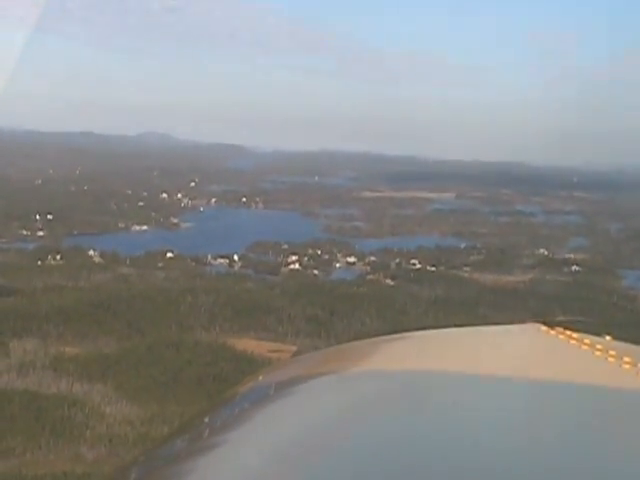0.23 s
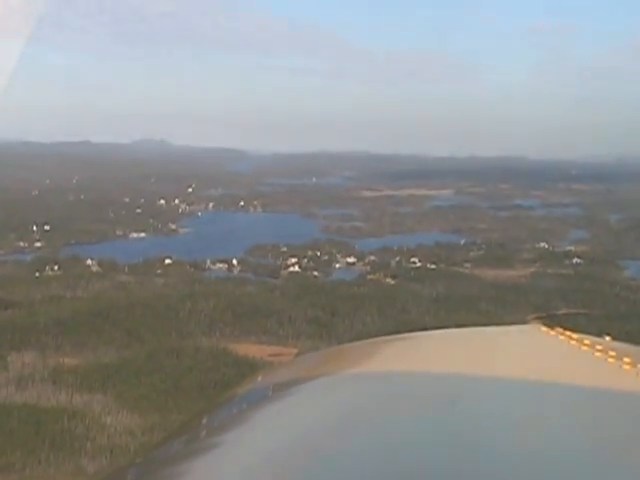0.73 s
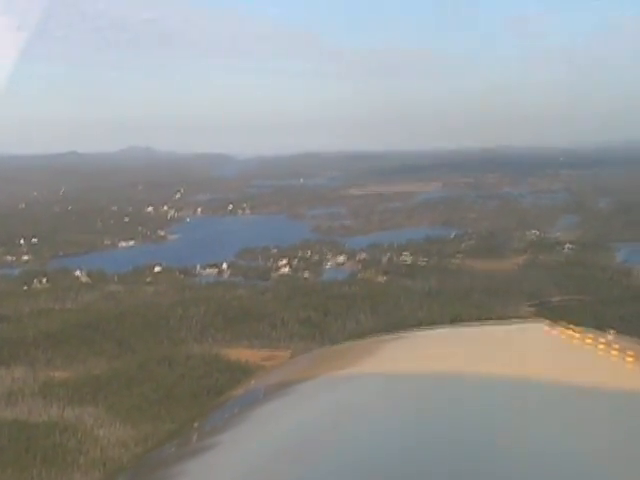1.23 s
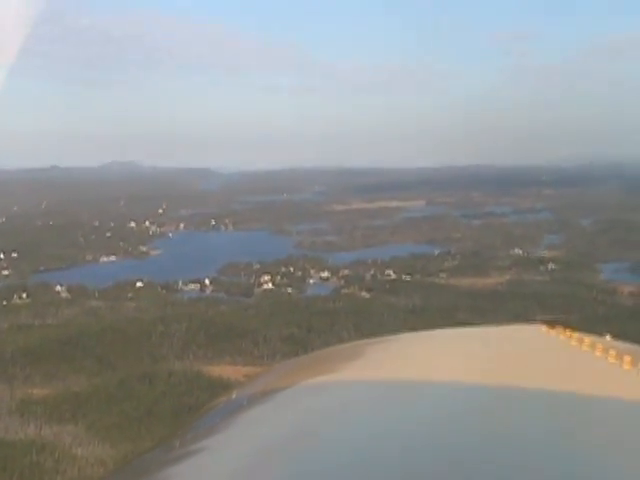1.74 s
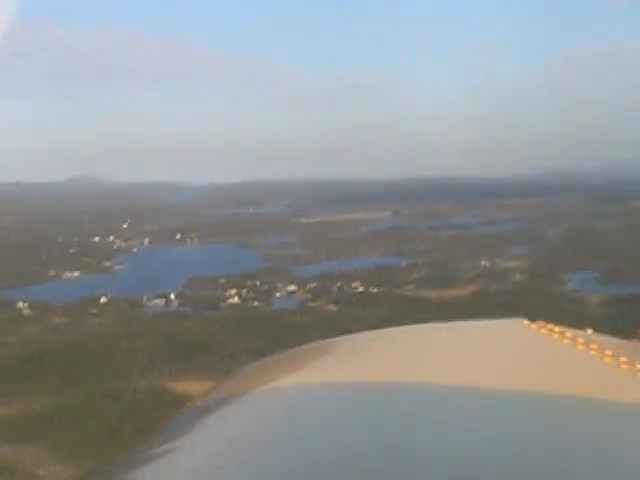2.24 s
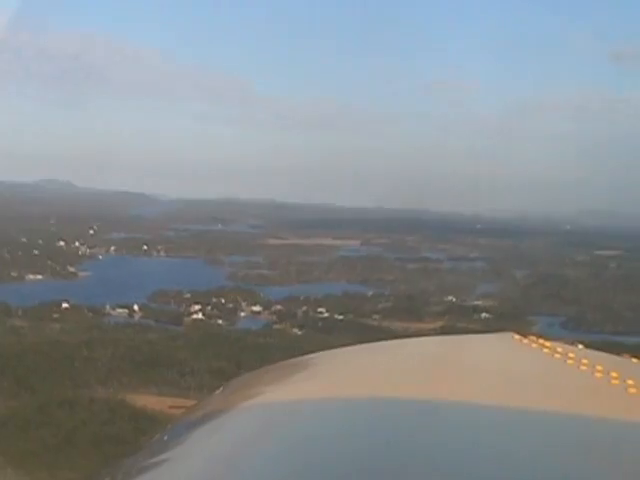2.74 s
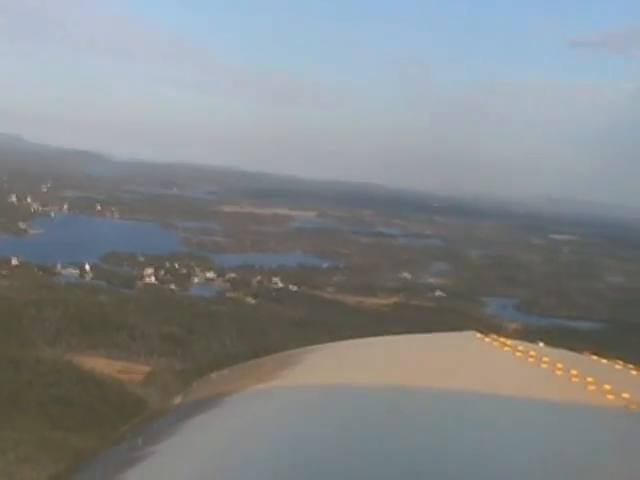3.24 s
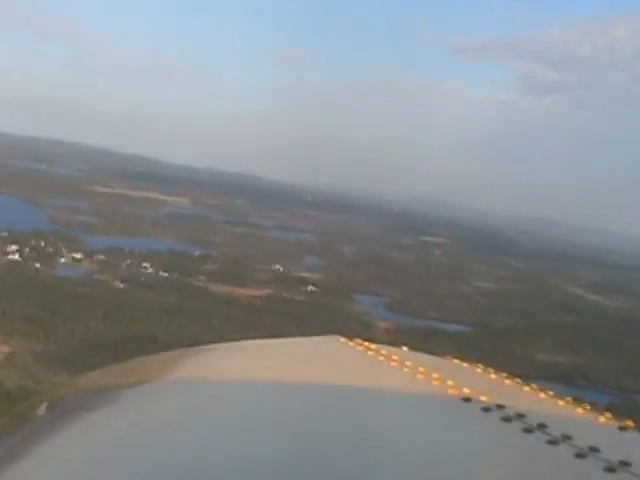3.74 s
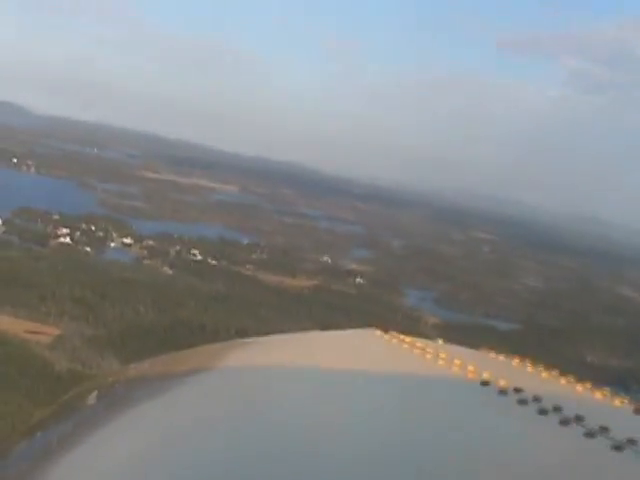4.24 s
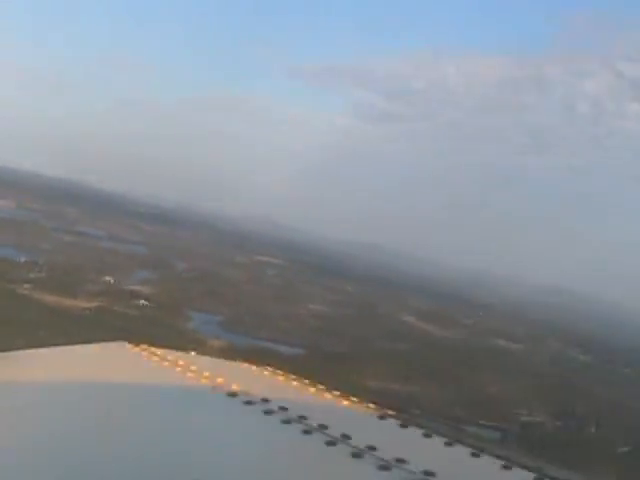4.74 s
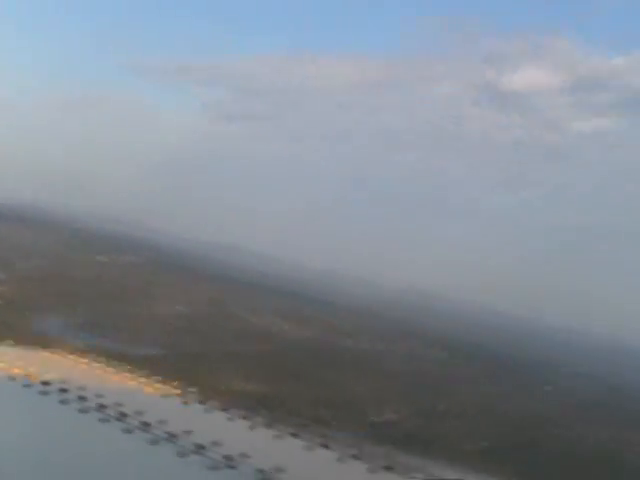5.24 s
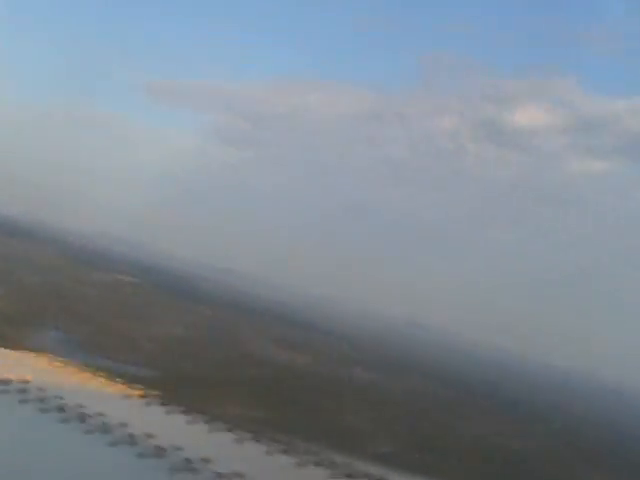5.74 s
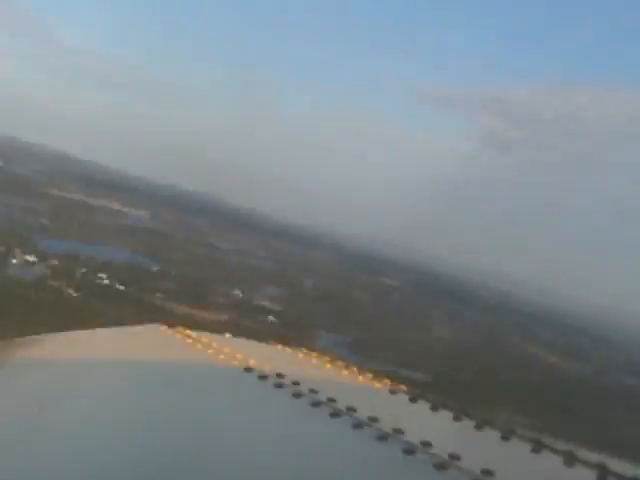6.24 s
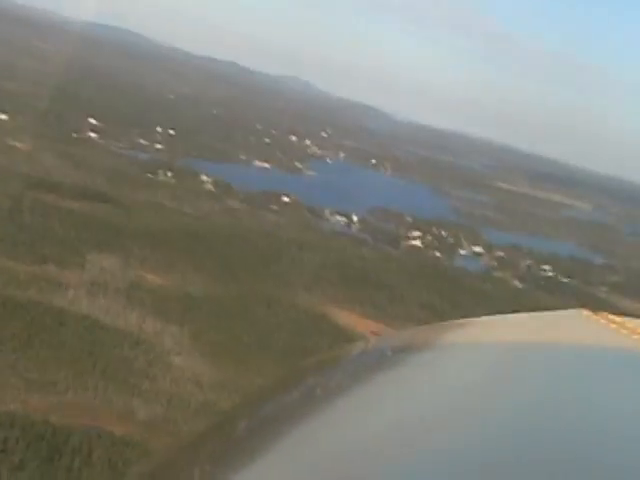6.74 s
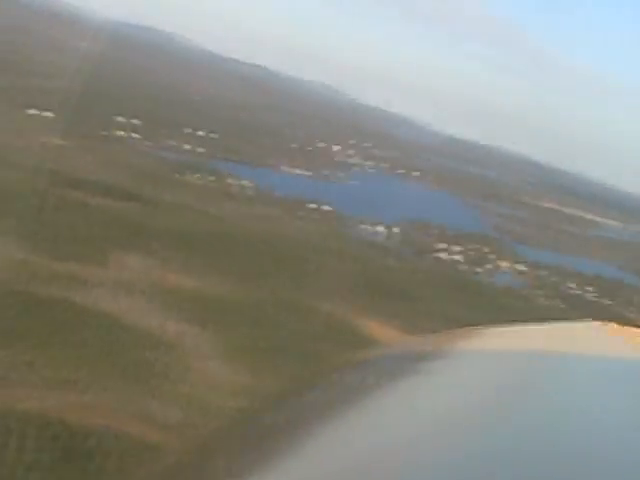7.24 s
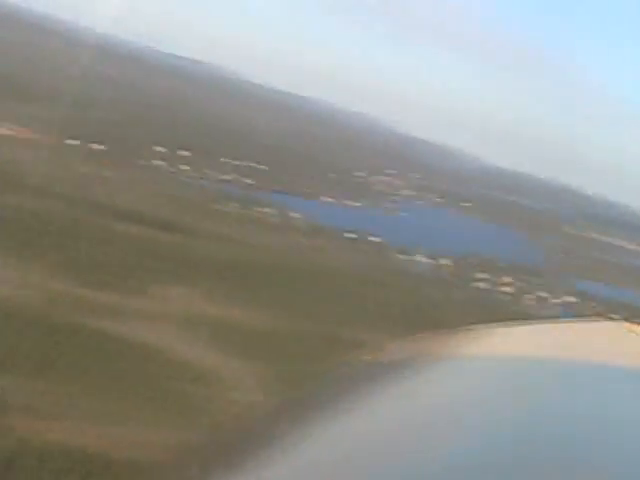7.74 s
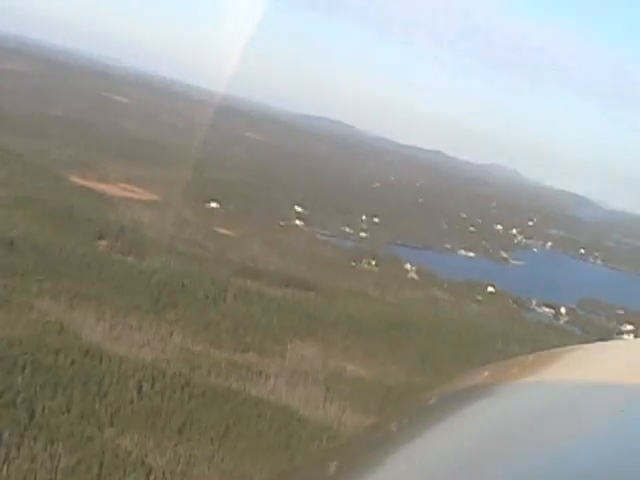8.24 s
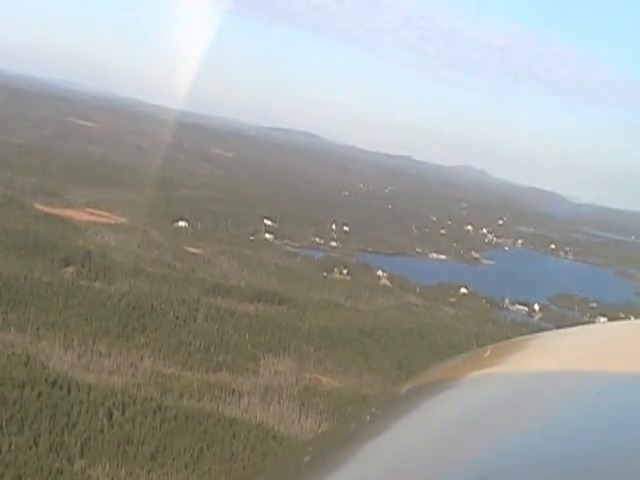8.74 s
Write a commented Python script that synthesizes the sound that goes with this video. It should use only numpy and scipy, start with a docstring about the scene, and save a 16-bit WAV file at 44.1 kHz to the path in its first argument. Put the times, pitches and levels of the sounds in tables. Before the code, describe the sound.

Steady throbbing drone of a small propeller plane heard from the cockpit, with airflow roar, a faint buzz and whine, one sharp knock and a softer one.

```python
"""The engine of a cruising light aircraft, heard close in the cockpit at a hand-held camera's two microphone ports.
The four-stroke is a sum of camshaft orders; a geared three-blade propeller adds blade passes, and a hum wavers.
Slipstream roar is shaped noise, lightly chopped by the turning engine.
The camera pans from the nose towards the wing, which changes the colour.
Two knocks on its body ring decaying modes, unequally at the ports."""
import sys
import numpy as np
from scipy import signal
from scipy.io import wavfile
from scipy.ndimage import uniform_filter1d

SR = 44100
rng = np.random.default_rng(int(sys.argv[2]) if len(sys.argv) > 2 else 0)


def waveform_to_disk(signal):
    """Save audio, clipped to [-1, 1], as 16-bit WAV at the path in sys.argv[1]."""
    frames = np.transpose(np.atleast_2d(signal))
    scaled = np.clip(frames, -1, 1) * 32767
    samples = np.round(scaled).astype(np.int16)
    wavfile.write(sys.argv[1], SR, samples)


N = 396018

# Camshaft speed in cruise: start_s, speed_rev_per_s
CAMSHAFT_SPEED = [(0, 35.234), (0.85, 35.236), (1.65, 35.31), (2.25, 35.32), (3.05, 35.24), (3.65, 35.32),
                  (4.75, 35.43), (5.3, 35.395), (5.6, 35.51), (6.15, 35.47), (7.0, 35.485), (7.8, 35.6),
                  (8.4, 35.6), (8.65, 35.52), (8.98, 35.518)]
# Engine orders in the cockpit, before they waver, level averaged over both ports:
# multiple of camshaft speed, forward_level_db (rms), wing_level_db (rms), left_minus_right_db
ENGINE_ORDERS = [(1, -47, -47, 0), (2, -30, -29, -1), (3, -40, -37, 1), (4, -23, -22, 1), (5, -36, -35, 1),
                 (6, -24, -26, 5), (7, -39, -36, 4), (8, -24, -22, 9), (9, -45, -49, 0), (10, -41, -37, 8),
                 (11, -34, -37, 7), (12, -44, -38, 11), (13, -39, -41, 4), (14, -46, -43, 2),
                 (15, -37, -42, 3), (16, -47, -39, 2), (17, -39, -35, 2), (18, -44, -47, 0),
                 (19, -49, -48, -1), (22, -53, -49, -5), (23, -45, -50, 6), (25, -44, -53, 6),
                 (26, -48, -47, -4), (27, -41, -48, 0), (28, -48, -49, 1), (29, -41, -43, 2),
                 (30, -50, -49, 0), (32, -38, -40, -1), (33, -48, -57, 3), (34, -40, -44, -2),
                 (35, -36, -41, -1), (36, -40, -46, 1), (37, -46, -51, -1), (38, -44, -47, -1),
                 (39, -43, -46, -2), (40, -42, -44, -3), (41, -47, -52, 1), (42, -44, -47, -1),
                 (43, -50, -52, -2), (44, -38, -33, -3), (45, -43, -45, 3), (46, -38, -45, 3),
                 (47, -54, -56, 3), (48, -39, -44, 2), (49, -45, -48, -2), (50, -46, -48, -1),
                 (51, -55, -57, 3), (52, -52, -46, 0), (53, -57, -56, -3), (54, -56, -59, -6),
                 (55, -68, -58, -2), (56, -58, -60, -2), (58, -57, -57, -3), (60, -52, -57, -1),
                 (64, -54, -56, -3), (67, -61, -58, -3), (68, -60, -58, -3), (70, -62, -58, -1),
                 (71, -64, -58, -1), (76, -68, -57, -4), (80, -53, -56, 0), (81, -58, -58, 0),
                 (82, -58, -51, -2), (83, -61, -54, -3), (84, -53, -55, -2), (86, -58, -47, -2),
                 (87, -60, -55, -2), (88, -52, -45, -3), (89, -57, -54, -2), (90, -48, -42, -4),
                 (91, -67, -58, -2), (92, -50, -51, 3), (94, -58, -57, -1), (96, -61, -54, -4),
                 (100, -66, -57, -4), (130, -62, -68, -1), (132, -61, -70, 0)]
# Buzz near 1.5 kHz, relative to its orders: start_s, level_db
BUZZ_LEVEL = [(0, -6), (0.7, -4), (0.9, 4), (1.8, 0), (2.05, -2), (2.35, -11), (2.7, -14), (3.3, 3),
              (4.2, 3.5), (5, 5.5), (6.1, 3), (6.25, -1.5), (7.1, -9.5), (7.8, -1.5), (8.5, -1.5),
              (8.98, -4.5)]
# Whine near 3.2 kHz, relative to its orders: start_s, lower_partial_db, whine_db, upper_partial_db
WHINE_LEVELS = [(0, -7, 3, 0), (1.2, -3, 1.5, 1), (2, -10, -2, 0), (4, -1, 0.5, 2), (5, -3, 2.5, -3),
                (5.6, 1, 1, -4), (6.3, -2, 3.5, -5), (6.6, 5, 0, -5), (7.3, 1.5, 4, 1), (7.55, -2, -2, 6),
                (8.1, -2, -1, 5), (8.5, 2, -5, 0), (8.98, 7, 2, -3)]
# Blade passes of the geared propeller, before they waver:
# multiple of propeller speed, level_db (rms), left_minus_right_db
BLADE_PASSES = [(1, -44, 0), (3, -24.5, 0), (6, -38, 4), (15, -47, 3)]
# Slipstream and engine roar, before it drifts: pitch_hz, forward_level_db (per Hz), wing_level_db (per Hz)
ROAR_SPECTRUM = [(22, -73, -70), (32, -55, -59), (50.3, -55, -49.5), (80, -54, -55), (117, -47, -51.5),
                 (156, -48.5, -49.5), (192, -49, -46.5), (225, -52.5, -51.5), (275, -50, -49.5),
                 (333, -55.5, -57), (400, -54.5, -54.5), (468, -55, -56), (760, -62, -63.5),
                 (1280, -61.5, -61), (1320, -66, -65.5), (1470, -67, -70), (1565, -65, -65.5),
                 (1940, -72.5, -75), (2680, -77.5, -75.5), (3140, -76, -73), (4110, -84, -84.5),
                 (4630, -83.5, -84.5), (5300, -90, -88), (9800, -91, -88), (11470, -94, -89.5),
                 (12500, -104, -102)]
# Roar near 1.4 kHz, relative; the engine orders there follow in part: start_s, level_db
MID_ROAR_LEVEL = [(0, 1.5), (5.6, 2), (6, -6), (6.4, -2), (7.1, -2), (7.3, -6), (8.65, -8), (8.85, 1),
                  (8.98, 7)]
# Treble hiss around 11 kHz, relative: start_s, level_db
TREBLE_LEVEL = [(0, 0), (3.1, 0), (3.7, 2.5), (5, 1.5), (6.4, 0.5), (7, 0), (8.98, -1)]
# The pair of microphone ports: pitch_hz, left_minus_right_db, left_lead_rad, coherence (0-1)
MICROPHONE_PORTS = [(30, 0, 2.8, .99), (50, -.3, 2.7, .99), (80, -.4, 2.45, .98), (120, 1.5, 2.15, .96),
                    (230, 4.9, 1.15, .85), (370, 4.6, .25, .8), (600, 2, -.27, .88), (1100, -.5, -.45, .93),
                    (1700, -.8, -.4, .74), (3100, -1.8, -.64, .8), (5500, -1.8, -1.4, .6),
                    (9500, .3, -2.24, .71), (11000, -.2, -2.85, .82), (11800, 0, -3.1, .96)]
# Blows on the camera body: start_s, level_db (before softening and rattle), softness (0-1)
BODY_KNOCKS = [(4.02, 1, 0), (6.2673, -7, 0.78)]
# Modes of the camera body, relative levels: pitch_hz, width_hz, left_level_db, right_level_db
BODY_MODES = [(640, 380, 4, -23), (950, 440, -15, -2.5), (1140, 280, -8, -13), (1610, 430, -15, -10),
              (2500, 470, -15, -18), (3030, 470, -14, -14), (4500, 1300, -8, -4), (7600, 1500, -11, -11),
              (11000, 2000, -23, -18)]

HOP = 512  # samples between control points and between noise frames
STRIDE = 4  # all tones lie under 5 kHz and are built on every fourth sample
CLOCK_S = np.arange(0, N, STRIDE) / SR
PAN_START_S, PAN_END_S = 3.5, 5.83  # the camera swings from the nose towards the wing
DIP_S, DIP_WIDTH_S, DIP_DB = 5.7, 0.59, -5  # the band near 1.1 kHz dips briefly
WOBBLE_RAD = 0.011  # rms; the shaft runs a little ahead or behind as the load hunts
PROPELLER_TURNS = 0.88  # per turn of the camshaft
HUM_HZ, HUM_DB, HUM_PAN_DB = 234.4, -41, 5
BEND_S = 0.0012  # after the blow the shell is bent furthest
EDGE_HZ = 12700  # upper band limit


def gain_of(db):
    """Decibels to gain."""
    return 10 ** (np.asarray(db) / 20)


def evened(x):
    """Scales to rms 1."""
    return x / np.sqrt(np.mean(x ** 2) + 1e-20)


def read(table, hz):
    """All columns of a spectrum table, on a log-frequency axis."""
    f, *columns = np.transpose(table)
    return [np.interp(np.log(hz + 1), np.log(f + 1), c) for c in columns]


def controls(table, t):
    """All columns of a time curve at times t."""
    s, *columns = np.transpose(table)
    return [np.interp(t, s, c) for c in columns]


def control_times():
    """Times in s of the control points, one per HOP."""
    return np.arange(0, N + HOP, HOP) / SR


def bump(x, centre, width):
    """Weight 1 at the centre, falling away on both sides, in frequency or time."""
    return np.exp(-((x - centre) / width) ** 2)


def drift(t, fastest_hz, slowest_hz=0.309, count=16):
    """Random wander of rms 1: sines of random phase, the slower ones larger."""
    f = np.geomspace(slowest_hz, fastest_hz, count)[:, None]
    start = rng.random((count, 1))
    waves = np.sin(2 * np.pi * (f * t + start)) / np.sqrt(f)
    return evened(waves.sum(0))


def aimed(forward_db, wing_db, hz, t):
    """Level of a frequency at times t as the camera pans, with the brief dip."""
    way = np.clip((t - PAN_START_S) / (PAN_END_S - PAN_START_S), 0, 1)
    aim = way ** 2 * (3 - 2 * way)  # starts and stops gently
    dip_db = DIP_DB * bump(t, DIP_S, DIP_WIDTH_S) * bump(hz, 1130, width=150)
    return forward_db + aim * (wing_db - forward_db) + dip_db


def tone(spin, hz, db, phase, pan_db, t):
    """One partial at both ports; spin is its turning phasor, db and phase are given at times t."""
    share = gain_of(pan_db) / np.sqrt((1 + gain_of(2 * pan_db)) / 2)
    _, lag, same = read(MICROPHONE_PORTS, hz)
    # each partial comes from its own side, chosen by chance
    side = rng.choice([-1, 1])
    lag = lag + 0.95 * np.sqrt(1 - same ** 2) * side * np.tanh(hz / 700)
    envelope = np.sqrt(2) * share * gain_of(db) * np.exp(1j * phase)
    left = spin * np.interp(CLOCK_S, t, envelope)
    delayed = np.cos(lag) * left.real + np.sin(lag) * left.imag
    return np.array([left.real, delayed / gain_of(pan_db)])


def engine(turn):
    """Camshaft orders: the lowest line up as exhaust pulses, those near 3 kHz as a tick in the cowling."""
    t = control_times()
    buzz_db = controls(BUZZ_LEVEL, t)[0]
    lower_db, whine_db, upper_db = controls(WHINE_LEVELS, t)
    mid_db = controls(MID_ROAR_LEVEL, t)[0]
    shaft = np.exp(1j * turn)
    out, spin, reached = 0, 1, 0
    for multiple, forward_db, wing_db, pan_db in ENGINE_ORDERS:
        # spin climbs order by order to this multiple
        for reached in range(reached + 1, round(multiple) + 1):
            spin = spin * shaft
        hz = reached * CAMSHAFT_SPEED[0][1]
        crank = reached % 2 == 0  # the crankshaft turns twice in each cycle
        locked = np.clip(crank * (hz < 450) + 0.91 * bump(hz, 3150, width=280), 0, 1)
        locked = max(locked, 0.17 * (hz > 450))  # each firing also jolts the panels, so the buzz throbs

        # the many paths through the airframe shift, the more so for short waves
        unrest = 0.088 + np.tanh(hz / 900) + 0.7 * hz / 3000
        # buzz and whine hold firmer
        unrest *= 1 - 0.55 * bump(hz, 1400, width=400) - 0.6 * bump(hz, 3170, width=120)

        smear = -3.1 + 0.22 * (min(reached / 2, 6) - 2.9) ** 2  # the exhaust pipe spreads the pulse, radians
        phase = smear + (1 - locked) * rng.uniform(-np.pi, np.pi)
        phase = phase + 0.36 * unrest * drift(t, fastest_hz=8)
        # blurs the highest lines
        phase = phase + 0.3 * (hz / 3200) ** 2 * drift(t, fastest_hz=25, slowest_hz=4)

        db = aimed(forward_db, wing_db, hz, t)
        db = db + 1.6 * unrest * drift(t, fastest_hz=5, slowest_hz=0.3)
        db = db + lower_db * bump(hz, 3100, width=25)
        db = db + whine_db * bump(hz, 3170, width=25)
        db = db + upper_db * bump(hz, 3241, width=25)
        # upper orders flutter
        db = db + 2.2 * np.tanh((hz / 2400) ** 2) * drift(t, fastest_hz=30, slowest_hz=6)
        db = db + 0.36 * mid_db * bump(hz, 1350, width=100)
        db = db + buzz_db * bump(hz, 1526, width=42)
        out = out + tone(spin, hz, db, phase, pan_db, t)
    return out


def propeller(turn):
    """Propeller orders, mostly blade passes and overtones, geared down from the engine."""
    t, out = control_times(), 0
    for multiple, db, pan_db in BLADE_PASSES:
        order = multiple * PROPELLER_TURNS
        level_db = db + 0.96 * drift(t, fastest_hz=3.1)
        phase = 2 * np.pi * rng.random()
        out = out + tone(np.exp(1j * order * turn), order * CAMSHAFT_SPEED[0][1], level_db, phase, pan_db, t)
    return out


def hum():
    """A faint hum of fixed pitch and wavering level, unrelated to the shaft."""
    t = control_times()
    spin = np.exp(2j * np.pi * HUM_HZ * CLOCK_S)
    level_db = HUM_DB + 1.7 * drift(t, fastest_hz=4.6)
    return tone(spin, HUM_HZ, level_db, 2 * np.pi * rng.random(), HUM_PAN_DB, t)


def roar(turn):
    """Slipstream noise in drifting patches, chopped lightly at crankshaft and camshaft rate."""
    frames = N // HOP + 9
    hz = np.fft.rfftfreq(2048, 1 / SR)[:, None]
    t = np.arange(frames) * HOP / SR
    a, b, c, d, patches = rng.standard_normal((frames, 1025, 5)).T
    patches = uniform_filter1d(patches, size=12, axis=0)  # across frequency
    patches = evened(uniform_filter1d(patches, size=14, axis=1))  # across time
    # treble flutters as one
    gusts = drift(t, fastest_hz=29.8, slowest_hz=3.5) * bump(hz, 9500, width=4500)
    mid_db = controls(MID_ROAR_LEVEL, t)[0] * bump(hz, 1370, width=86)
    treble_db = controls(TREBLE_LEVEL, t)[0] * bump(hz, 11400, width=6500)

    # the right port shares part of the left port's noise, later or earlier
    pan_db, lag, same = read(MICROPHONE_PORTS, hz)
    same = np.clip(same, 0, 1)
    left = a + 1j * b
    right = (same * left + np.sqrt(1 - same ** 2) * (c + 1j * d)) * np.exp(-1j * lag)
    spectrum = np.array([left * gain_of(pan_db / 2), right / gain_of(pan_db / 2)])

    level_db = aimed(*read(ROAR_SPECTRUM, hz), hz, t)
    spectrum *= gain_of(level_db + 1.03 * patches + 0.49 * gusts + mid_db + treble_db)
    air = signal.istft(spectrum, nperseg=2048, noverlap=2048 - HOP)[1][:, :N]
    air *= np.sqrt(1536 * SR / 2048 / HOP)  # dB per Hz to frame amplitude
    chop = 1 + 0.085 * np.cos(2 * turn + 2.4) + 0.045 * np.cos(turn + 0.68)
    return air * chop


def knocks():
    """A blow rings the camera body, each port hearing its own share of the modes; a rattle trails."""
    t = np.arange(1500) / SR
    blows, ring = np.zeros((2, N)), 0
    for hz, width, left_db, right_db in BODY_MODES:
        age = np.pi * width * t
        swell = age * np.exp(-age)  # each mode swells, then dies; wide treble modes speak first
        port_gains = gain_of([[left_db], [right_db]])
        ring = ring - port_gains * swell * np.cos(2 * np.pi * hz * (t - BEND_S))
    # a small shell radiates little bass
    ring = signal.lfilter(*signal.butter(1, 250, "highpass", fs=SR), ring)

    for s, db, soft in BODY_KNOCKS:
        strike = 0.075 * np.diff(rng.standard_normal((2, 601))) * np.exp(-t[:600] / 0.0045)  # rattle
        strike[:, 0] += 1  # the blow itself
        soft = np.clip(soft, 0, 0.95)
        softened = signal.lfilter([1 - soft], [1, -soft], strike)
        blows[:, round(s * SR):][:, :600] += gain_of(db) * softened
    return signal.oaconvolve(blows, ring / abs(ring).max(), axes=1)[:, :N]


def scene():
    """Engine, propeller, hum, roar and knocks at the two ports."""
    speed = controls(CAMSHAFT_SPEED, np.arange(N) / SR)[0]
    turn = 2 * np.pi * np.cumsum(speed) / SR  # camshaft angle in radians
    t = control_times()
    wobble = drift(t, fastest_hz=4, slowest_hz=0.5)
    turn = turn + WOBBLE_RAD * np.interp(np.arange(N), t * SR, wobble)
    coarse = turn[::STRIDE]
    tones = engine(coarse) + propeller(coarse) + hum()
    tones = signal.resample_poly(tones, up=STRIDE, down=1, axis=1)[:, :N]
    return tones + roar(turn) + knocks()


def record(dry):
    """Full-scale clipping, then the band limit."""
    clipped = np.clip(dry, -1, 1)
    lowpass = signal.firwin(511, EDGE_HZ, window=("kaiser", 9), fs=SR)
    return signal.oaconvolve(clipped, lowpass[None], "same")


dry = scene()
out = record(dry)
waveform_to_disk(out)
```